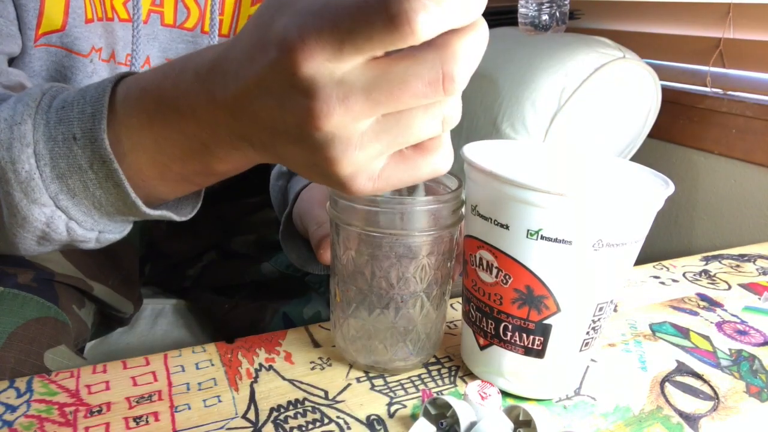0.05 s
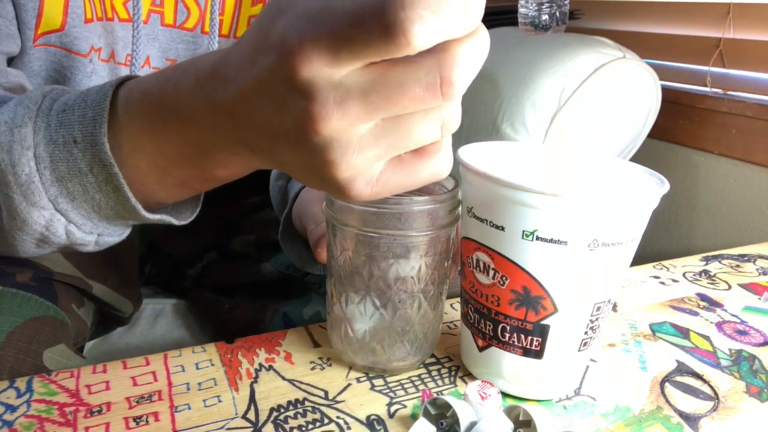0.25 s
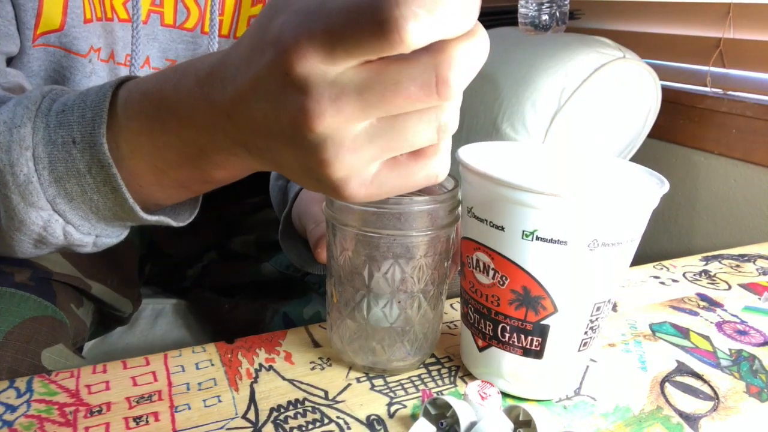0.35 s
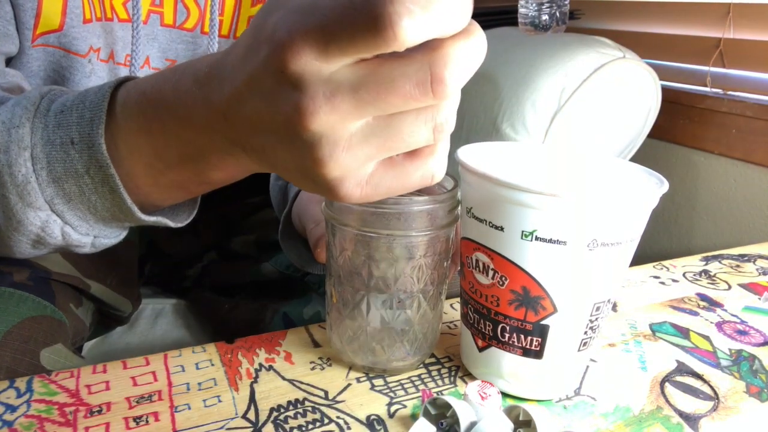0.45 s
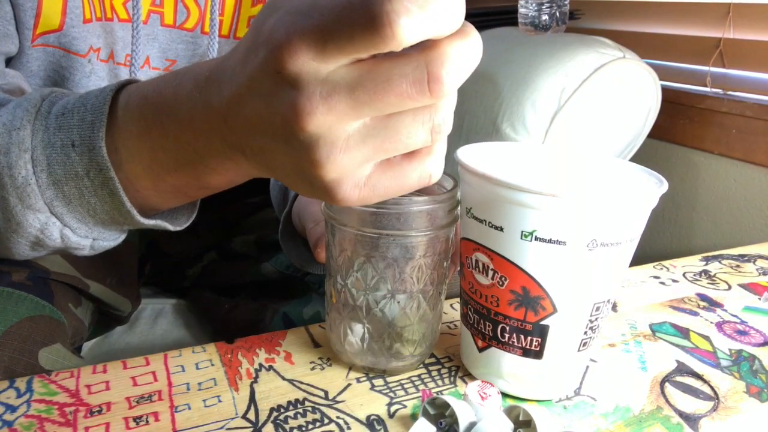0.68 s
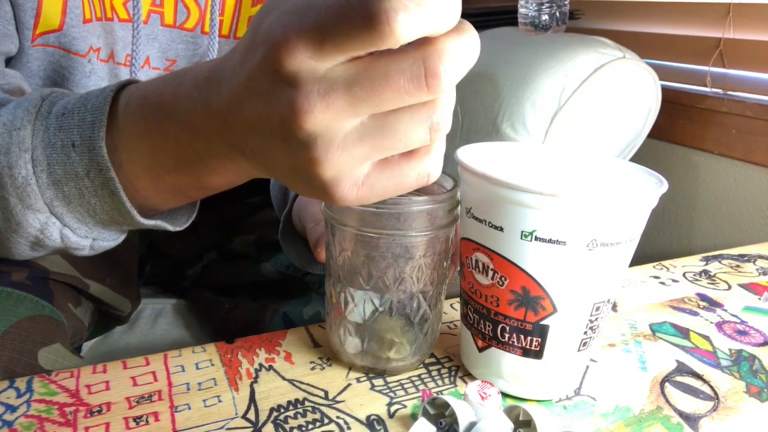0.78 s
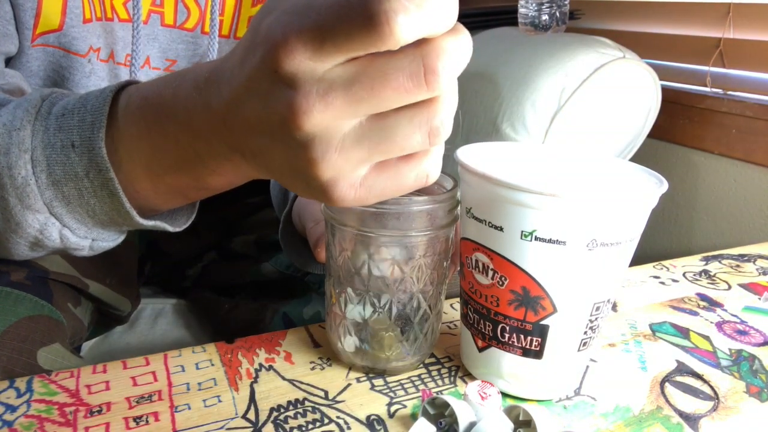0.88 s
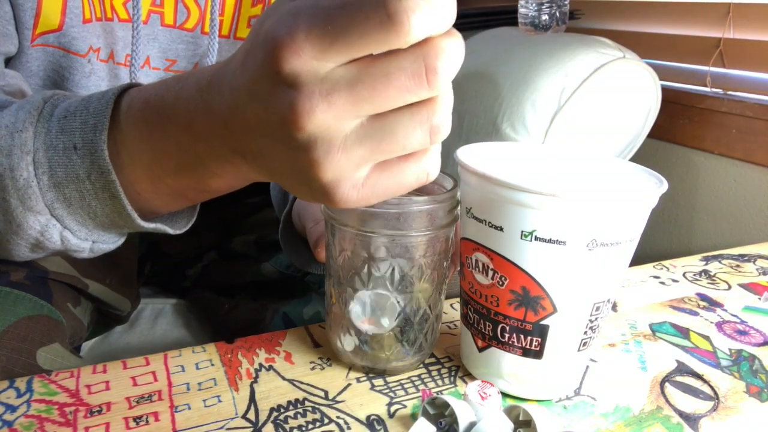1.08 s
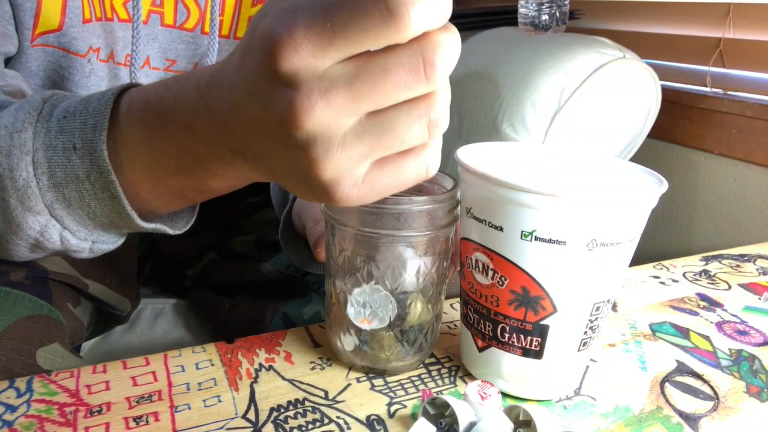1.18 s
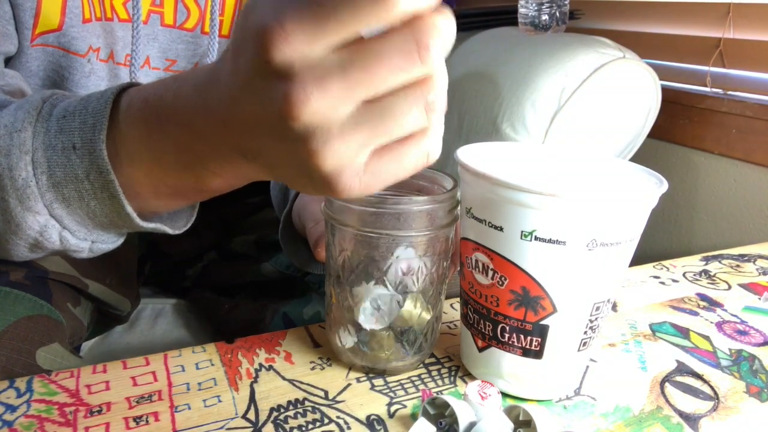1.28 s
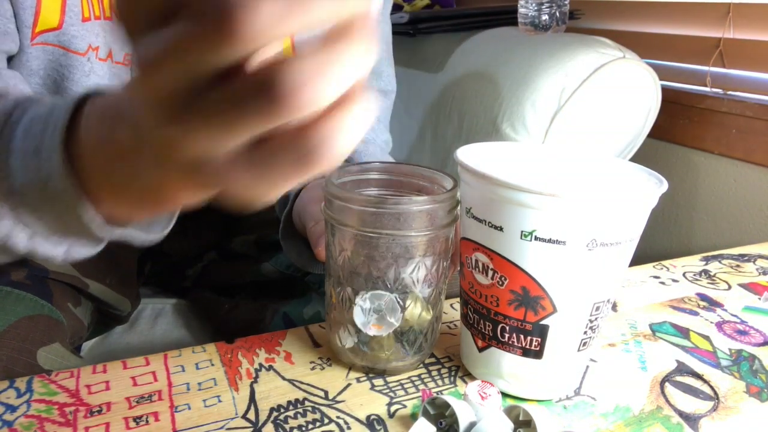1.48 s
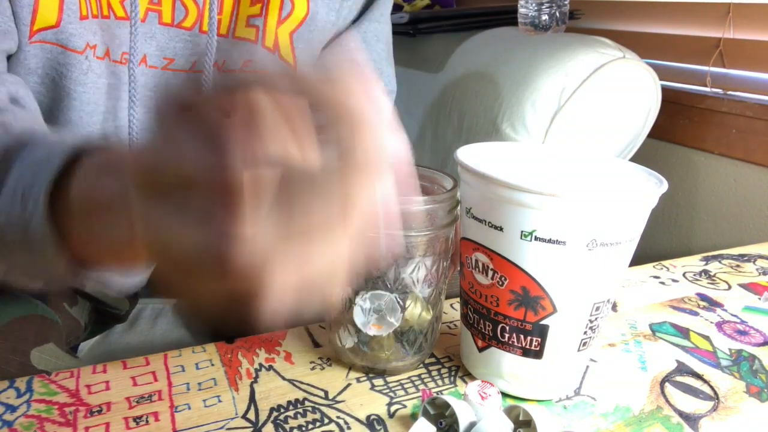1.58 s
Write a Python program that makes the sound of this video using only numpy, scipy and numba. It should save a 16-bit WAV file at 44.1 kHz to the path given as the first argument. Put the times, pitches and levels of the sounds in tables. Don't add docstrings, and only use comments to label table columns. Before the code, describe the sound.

Small plastic caps drop by the handful into a glass jar: one sharp first clack, then a dense bright clatter with faint glass pings and light table thuds, settling quickly, close microphone in a quiet room.

```python
import sys
import numpy as np
from scipy import signal
from scipy.fft import rfft, irfft
from scipy.io import wavfile
from numba import njit

SR = 44100
rng = np.random.default_rng(int(sys.argv[2]) if len(sys.argv) > 2 else 0)


def to_wav(sig):
    pcm = np.clip(np.atleast_2d(sig), -1, 1) * 32767
    pcm = np.round(pcm).astype(np.int16)
    wavfile.write(sys.argv[1], SR, pcm.T)


def natural_amplitude(level_db):
    exponent = np.asarray(level_db, float) / 20
    return 10 ** exponent


N = 72765


@njit
def ring(s, hz, t60, size, rise, n, sr):
    out = np.zeros(n)
    for k in range(len(s)):
        turn = np.exp(2j * np.pi * hz[k] / sr - np.log(1000.) / (t60[k] * sr))
        wave = size[k] + 0j
        swell = 0.
        start = int(s[k] * sr)
        for j in range(start, min(n, start + int(1.3 * t60[k] * sr))):
            swell += (1 - swell) / (1 + rise[k] * sr)
            wave *= turn
            out[j] += swell * wave.imag
    return out


def tones(s, hz, t60, db, rise):
    columns = np.broadcast_arrays(s, hz, t60, natural_amplitude(db), rise)
    columns = [np.ascontiguousarray(c, float).ravel() for c in columns]
    return ring(*columns, N, 1. * SR)


def after(s, db, t60):
    kicks = np.bincount((s * SR).astype(int), natural_amplitude(db), N)[:N]
    return signal.lfilter([1], [1, -1000 ** (-1 / (t60 * SR))], kicks)


def falling_caps():
    # start in seconds, level in dB, strongest cap tone in Hz.
    cap_contacts = [(0.1375, -49.5, 4200), (0.202, -52.5, 4760), (0.2244, -9.5, 4700), (0.2334, -50, 4600),
                    (0.2951, -19, 8810), (0.3123, -29, 8200), (0.3377, -21, 4560), (0.3502, -26, 4600),
                    (0.3768, -30, 2300), (0.4138, -34, 4370), (0.438, -44, 4830), (0.4564, -40.5, 4860),
                    (0.4753, -17.5, 4640), (0.4981, -34.5, 3320), (0.5134, -36.5, 3470), (0.5664, -37, 2540),
                    (0.5725, -37, 3420), (0.5848, -28.5, 4180), (0.592, -17.5, 2930), (0.614, -20.5, 9620),
                    (0.6254, -20, 4750), (0.6307, -14, 4620), (0.638, -16.5, 2830), (0.6769, -22, 5890),
                    (0.6963, -26.5, 3150), (0.7129, -31.5, 4320),
                    (0.7372, -32.5, 3300), (0.7472, -29.5, 2830), (0.7611, -21, 4720), (0.7615, -19, 2900),
                   (0.768, -18, 2930), (0.7858, -32, 3000), (0.8200, -16.5, 4380), (0.8235, -15.5, 2440),
                   (0.8458, -24.5, 3080), (0.8586, -26, 2780), (0.8748, -27, 2850), (0.8891, -22, 2840),
                   (0.8984, -20, 2800), (0.9107, -26.5, 2950), (0.939, -41, 2350), (0.9422, -23.5, 2380),
                   (0.9493, -22.5, 5300), (0.9697, -25, 2830), (0.9804, -28, 4680), (0.9949, -27.5, 2730),
                   (0.9982, -23.5, 2740), (1.006, -37, 2930), (1.0244, -29, 7270), (1.039, -24, 2840),
                   (1.0572, -22.5, 2320), (1.0631, -23, 4710), (1.083, -38, 2100),
                    (1.1038, -21.5, 2400), (1.1080, -27.5, 2560), (1.1342, -19, 2706), (1.14, -24.5, 2260),
                 (1.1475, -20, 2925), (1.1502, -10, 2540), (1.1543, -20, 5420), (1.1619, -17.5, 2570),
                 (1.1983, -31, 3770), (1.2167, -34, 5140), (1.219, -21, 4930), (1.241, -21, 3590),
                 (1.2514, -20, 5270), (1.2742, -30, 2200), (1.292, -33.5, 2280), (1.3027, -26, 2714),
                 (1.3097, -26.5, 5200), (1.326, -27, 5620), (1.3431, -16, 3530), (1.3491, -20, 3040),
                 (1.3626, -21.5, 3690), (1.381, -28.5, 2690), (1.4160, -32, 4680), (1.4462, -26, 2480),
                 (1.4914, -31.5, 2200), (1.5151, -39, 3270)]
    return np.array(cap_contacts).T


def touches():
    # start in seconds, level in dB, strongest cap tone in Hz.
    light_touches = [(.469, -47, 9100), (0.482, -41, 4640), (.554, -50, 2300), (0.604, -42, 8540),
                     (0.7015, -35, 3040), (1.1113, -36, 2430), (1.12, -37, 2500), (1.127, -32, 4600),
                     (1.130, -25, 5700), (1.166, -35, 2670), (1.187, -48, 6320), (1.2245, -34.5, 4320),
                     (1.285, -41, 5010), (1.4459, -39, 5230), (1.482, -57, 2300), (1.512, -54, 4460)]
    return caps(*np.array(light_touches).T)


def caps(s, db, hz):
    own_tone = tones(s, hz, 0.01, db + 3, 0.0008)
    click = tones(s, np.sqrt(hz * 2300), 0.0022, db - 3, .0001)
    chance = rng.random((len(s), 2))
    again = (s[:, None] + 0.0057 * (0.2016 + chance)).ravel()
    again_db = (db[:, None] - 4.5 * (1 + chance)).ravel()
    rebounds = clack(again, again_db, np.repeat(hz, 2))
    crack_db = (db + 24.5) * 1.25 - 36
    return own_tone + clack(s, db + 3, hz) + click + rebounds + crack(s, crack_db)


def clack(s, db, own_hz):
    # tone in Hz, level in dB, fade time (t60) in seconds.
    cap_modes = [(2280, -5.5, 0.015), (3010, -6, 0.013), (3993, -5, 0.011), (4748, -10, 0.019),
                 (5583, -7.5, 0.014), (6166, -5.5, 0.0098), (7860, -11.5, 0.023), (8880, -5.5, 0.012),
                 (12300, -32, .01), (14300, -36, .01)]
    hz, mode_db, t60 = np.array(cap_modes).T
    chance = rng.standard_normal((len(s), 2, len(hz)))
    octaves_away = np.abs(np.log2(hz / own_hz[:, None]))
    tuned_hz = hz * (1 + 0.0546 * chance[:, 0])
    tone_db = db[:, None] + mode_db - 8 * octaves_away + 4 * chance[:, 1]
    return tones(s[:, None], tuned_hz, t60, tone_db, 0.0014)


def crack(s, db):
    grain = np.repeat(rng.exponential(size=N // 64 + 1), 64)[:N]
    burst = after(s, db, 0.0025)
    fizz = (1 + grain) * after(s, db - 19, 0.092) / 2
    noise = rng.standard_normal(N) * (burst + fizz)
    return signal.lfilter(*signal.butter(2, 9500, fs=SR), noise)


def first_hard_hit():
    return tones(.2245, 6200, 0.01, -14, .0006)


def snaps():
    # start in seconds, level in dB, centre in Hz.
    edge_snaps = [(0.2234, -28, 15000), (0.296, -33, 14100), (0.3114, -39, 11700), (0.3374, -58, 14900),
                  (0.3504, -56, 12300), (0.3765, -47, 14600), (0.4564, -66, 13700), (0.4684, -38, 13500),
                  (0.4739, -26, 13500), (0.4974, -60, 12600), (0.5736, -42, 12000), (0.5844, -39, 14200),
                  (0.5926, -38, 14000), (0.6155, -47, 13200), (0.6235, -30, 14200), (0.6304, -39, 13900),
                  (0.6374, -45, 12100), (0.676, -32, 13900), (0.7146, -37, 12300), (0.7472, -39, 13700),
                  (0.7597, -34, 11330), (0.769, -30.5, 11950), (0.822, -35, 13600), (0.823, -31, 13700),
                  (0.8545, -46, 12400), (0.89, -39, 13300), (0.8989, -36, 11800), (0.9414, -50, 11800),
                  (0.9497, -36.5, 13600), (0.9916, -43, 13200), (1.025, -41, 11500), (1.0404, -49.5, 13900),
                  (1.065, -48, 14000), (1.1074, -40, 14900), (1.1333, -33, 11300), (1.1474, -43, 12500),
                  (1.1518, -30, 13400), (1.152, -37.5, 13000), (1.1714, -44.5, 12200), (1.2191, -41, 14300),
                  (1.242, -41.5, 13700), (1.2514, -50.5, 14100), (1.284, -49, 14100), (1.3259, -48, 13100),
                  (1.344, -32, 14300), (1.3505, -31, 14300), (1.3624, -49, 14500), (1.4152, -45, 13100),
                  (1.4456, -65, 13500)]
    s, db, hz = np.array(edge_snaps).T[:, :, None]
    fade_s, tail_s = 0.011, .06
    chance = rng.standard_normal((len(s), 4, 10))
    wait = np.abs(chance[:, 3])
    near_hz = np.clip(hz * (1 + 0.061 * chance[:, 0]), 10000, 16000)
    clump = tones(s + .0012 * wait, near_hz, fade_s, db - 7.5 + 3 * chance[:, 1], 0.0009)
    late = wait * tail_s / 4
    far_hz = np.clip(13000 + 1800 * chance[:, 2], 10000, 16000)
    grains = tones(s + late, far_hz, fade_s, db - 1.5 - 60 * late / tail_s, 0.00056)
    return clump + grains


def rattle():
    # time in seconds, level in dB.
    heap_motion = [
        (.2, -71),
        (.24, -51.5),
        (.5, -41.5),
        (.555, -60.5),
        (.58, -45.5),
        (.8, -39.5),
        (1.15, -41),
        (1.35, -38),
        (1.5, -46.5),
        (1.56, -62),
    ]
    s = np.sort(rng.uniform(.2, 1.58, size=520))
    spread_db = 3 * np.minimum(rng.exponential(size=len(s)), 2.5)
    db = np.interp(s, *np.array(heap_motion).T) + spread_db
    hz = 2300 * 2 ** (0.34 * rng.random(len(s)))
    return clack(s, db, hz) + crack(s, db - 24) + table(s[::4], db[::4] - 6)


def settle(x):
    still = np.clip((np.arange(N) / SR - 1.4) * 20, 0, 1)
    dull = signal.lfilter(*signal.butter(2, 5500, fs=SR), x)
    return x + still * (dull - x)


def glass_wall():
    # start in seconds, then low, middle and high ring levels in dB.
    wall_blows = [(0.257, -45, -42, -56), (0.378, -33, -29, -48), (0.6159, -25.5, -24, -31),
                  (0.6313, -25, -50, -55), (0.747, -37.5, -39, -43), (0.890, -32, -32, -39),
                  (0.956, -31.5, -45, -55.5), (0.986, -38, -34.5, -60), (1.025, -33, -34, -40.5),
                  (1.0398, -25.5, -37, -37), (1.1548, -25, -21.5, -28), (1.186, -58, -46, -46),
                  (1.2697, -41.5, -42, -50), (1.3026, -32, -52.5, -63.5), (1.3114, -47.5, -38, -64.5),
                  (1.3238, -29, -34.5, -68), (1.3499, -24, -22, -24), (1.3806, -34.5, -47.5, -57),
                  (1.4469, -49, -72, -53.5)]
    s, low, mid, high = np.array(wall_blows).T
    low_t60 = 0.16
    leaning = (s > .6) & (s < .93)
    out = tones(s, 2801, low_t60 * np.where(leaning, 0.21, 1), low, 0.0009)
    out = out + tones(s[leaning], 3090, low_t60, low[leaning] - 2.5, 0.0026)
    out = out + bell(s, 7578, 0.029, mid)
    out = out + bell(s, 8455, 0.025, (mid + high) / 2 - 2)
    return out + bell(s, 9604, 0.029, high)


def glass_base():
    # start in seconds, low ring level in dB, high ring level in dB.
    base_blows = [(0.225, -28.5, -36.5), (0.3383, -40, -70), (0.414, -50, -64), (0.475, -35.5, -58),
                  (0.496, -34, -62), (0.5715, -63, -37), (0.5914, -44, -40), (0.6754, -41, -39.5),
                  (0.768, -33, -34), (0.9503, -49, -43), (1.1512, -54, -29.5), (1.198, -47, -43),
                  (1.343, -46, -51)]
    s, low, high = np.array(base_blows).T
    damp = np.exp(-2.2 * (s - s[0]))
    low_ring = bell(s, 3413, 0.032, low)
    linger = tones(s, 3413, .3 * damp, low - 7, .002)
    high_t60 = 0.099 * damp
    high_ring = bell(s, 10650, high_t60, high) + bell(s, 10710, high_t60, high - 11)
    return low_ring + linger + high_ring


def bell(s, hz, t60, db):
    return tones(s, hz, t60, db, 0.00049) + tones(s, hz, t60 * 3.8, db - 15, 0.0005)


def landings():
    # start in seconds, level in dB.
    heavy_landings = [(0.224, -30), (0.295, -25.5), (0.376, -37), (0.567, -36), (0.592, -23.5), (0.63, -25),
                      (0.677, -26), (0.761, -68), (0.824, -30), (0.891, -30), (0.948, -33), (0.993, -26),
                      (1.057, -34.5), (1.133, -28), (1.216, -35), (1.242, -29), (1.273, -34.5),
                      (1.344, -23), (1.447, -43.5)]
    return table(*np.array(heavy_landings).T)


def table(s, db):
    # tone in Hz, level in dB, fade time (t60) in seconds.
    table_modes = [(160.2, -12.5, 0.14), (208.2, -5, 0.057), (397, -2, 0.035), (519.5, -17, 0.06),
                   (728.4, 1.5, 0.022), (1088, -1, 0.0095), (1486, -10.5, 0.023)]
    hz, mode_db, t60 = np.array(table_modes).T
    chance = rng.standard_normal((len(s), 2, len(hz))) * [[.012], [2]]
    lag = 0.0023 * np.minimum(400 / hz, 1.3) ** 2
    tone_db = db[:, None] + mode_db + chance[:, 1]
    thud = tones(s[:, None] + lag, hz * (1 + chance[:, 0]), t60, tone_db, lag)
    return signal.lfilter(*signal.butter(2, 110, "high", fs=SR), thud)


def room(x):
    tail_db, t60 = -16, 0.16
    t = np.arange(SR // 2) / SR
    tail = rng.standard_normal(len(t)) * 1000 ** (-t / t60) * np.minimum(t / 0.004, 1)
    tail = signal.lfilter(*signal.butter(1, 11000, fs=SR), tail)
    return signal.fftconvolve(x, tail * natural_amplitude(tail_db) / np.linalg.norm(tail))[:N]


def air():
    # frequency in Hz, level in dB per Hz.
    air_curve = [(24, -30.5), (40, 5.5), (600, -9.5), (2050, -16.5), (12500, -29.5), (16000, -28.5)]
    f = np.arange(N // 2 + 1) * SR / N + 1
    hz, db = np.array(air_curve).T
    shape = natural_amplitude(np.interp(np.log(f), np.log(hz), db))
    x = irfft(rfft(rng.standard_normal(N)) * shape, N)
    return x * natural_amplitude(-69) / x.std()


def scene():
    s, db, hz = falling_caps()
    plastic = settle(rattle() + caps(s, db, hz) + touches()) + first_hard_hit() + snaps()
    glass = glass_wall() + glass_base()
    wood = landings() + table(s, db - 18)
    near = plastic + glass + wood
    return (near + room(near) + air())[None]


def top_cut(x):
    return signal.sosfilt(signal.butter(12, 16820, fs=SR, output="sos"), x)


def record(dry):
    low = signal.butter(2, 50, "high", fs=SR, output="sos")
    top = signal.cheby1(8, 1, 15600, fs=SR, output="sos")
    return top_cut(signal.sosfilt(np.vstack([low, top]), dry))


dry = scene()
out = record(dry)
to_wav(out)
```